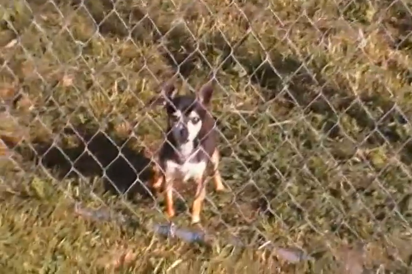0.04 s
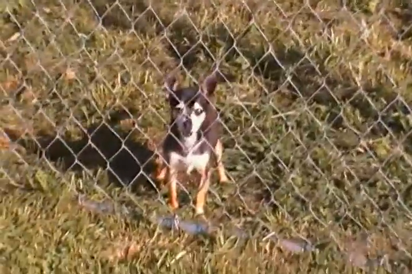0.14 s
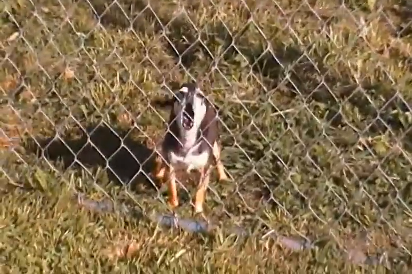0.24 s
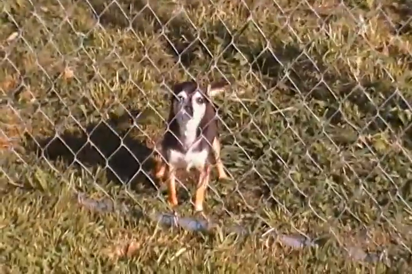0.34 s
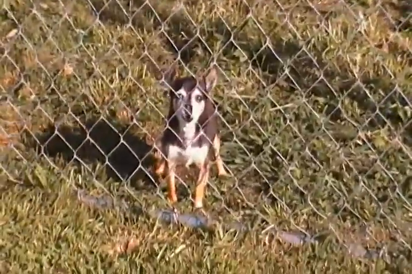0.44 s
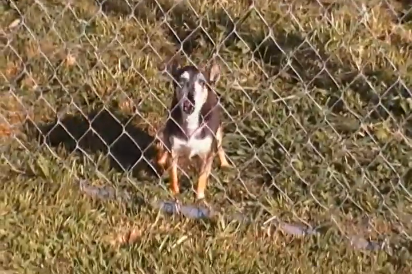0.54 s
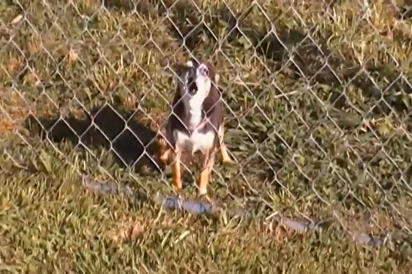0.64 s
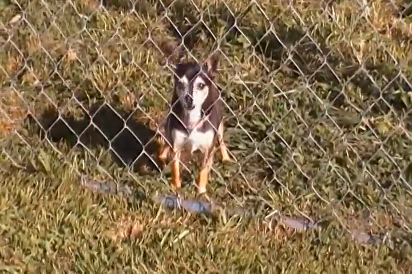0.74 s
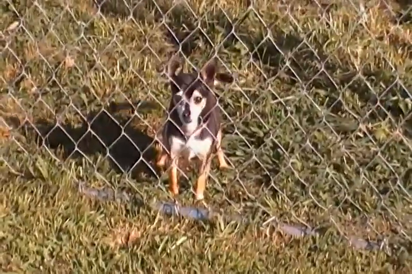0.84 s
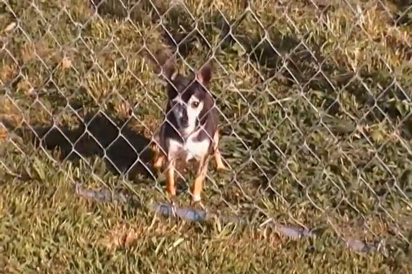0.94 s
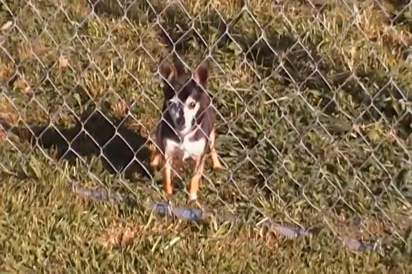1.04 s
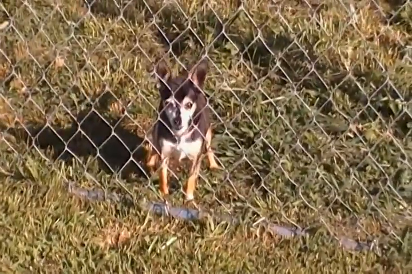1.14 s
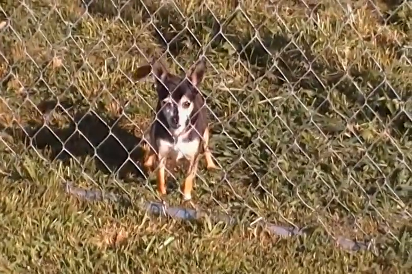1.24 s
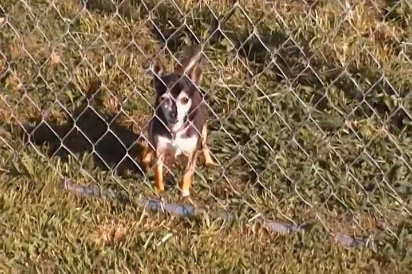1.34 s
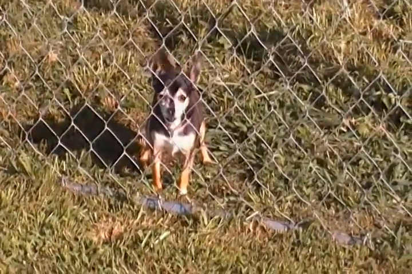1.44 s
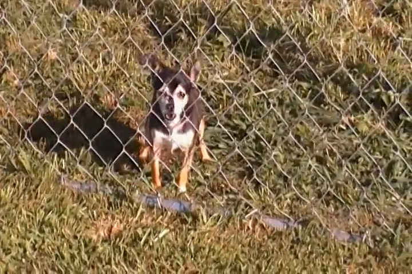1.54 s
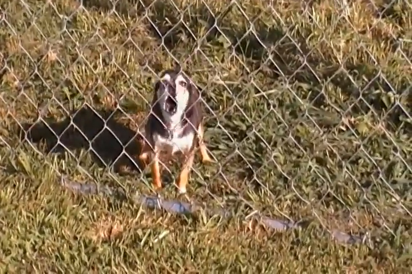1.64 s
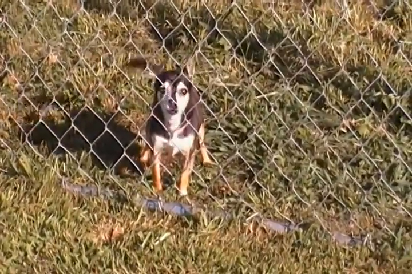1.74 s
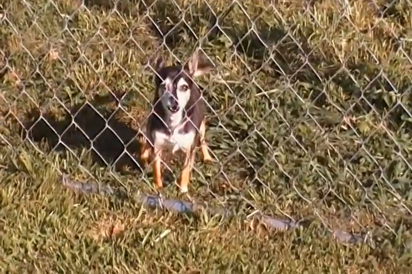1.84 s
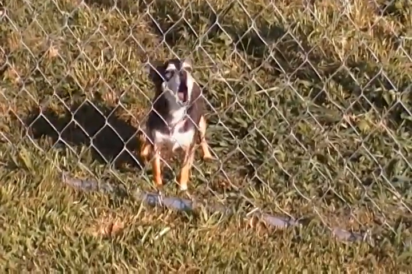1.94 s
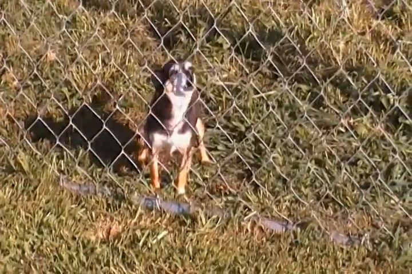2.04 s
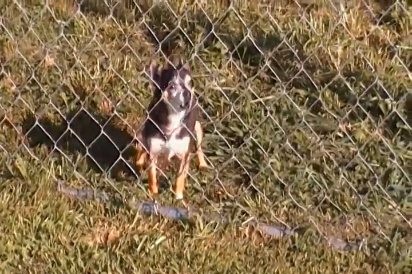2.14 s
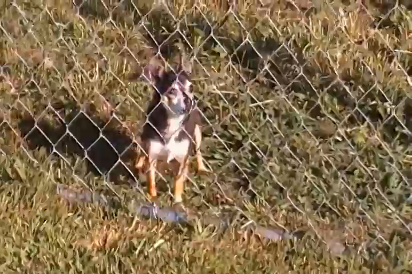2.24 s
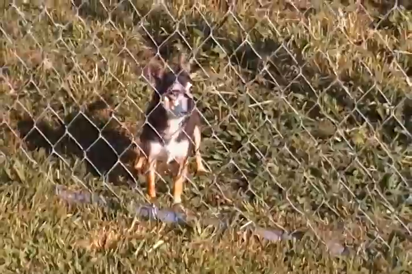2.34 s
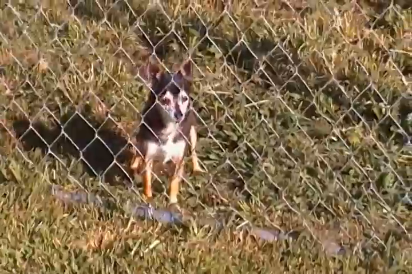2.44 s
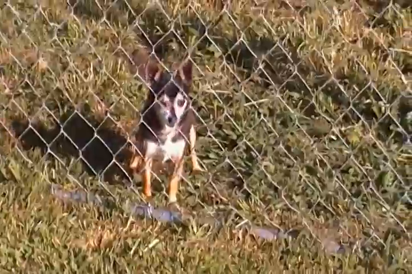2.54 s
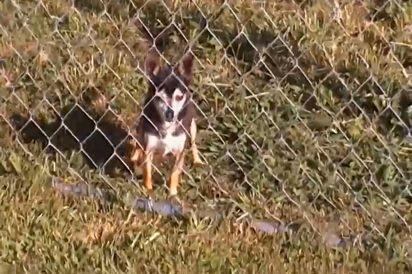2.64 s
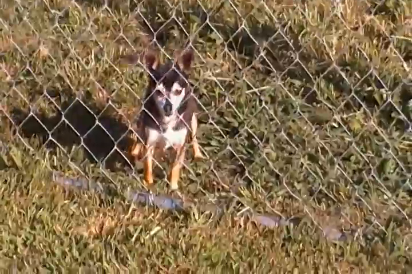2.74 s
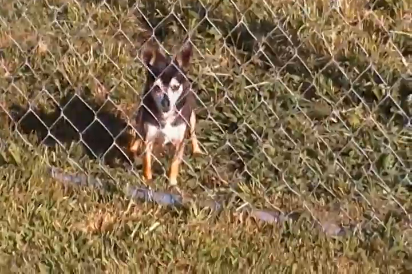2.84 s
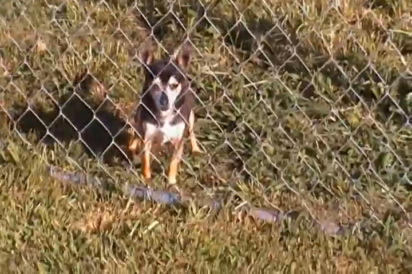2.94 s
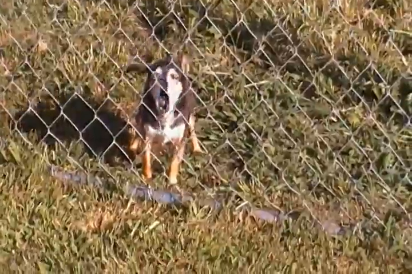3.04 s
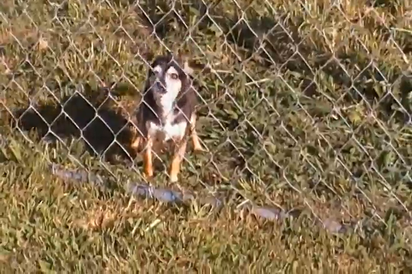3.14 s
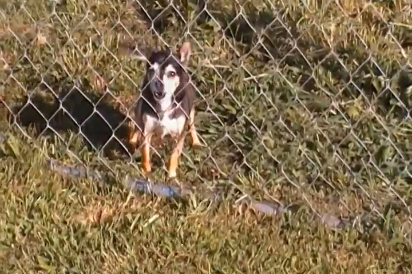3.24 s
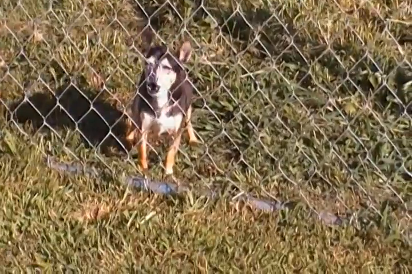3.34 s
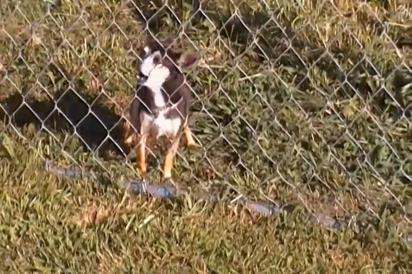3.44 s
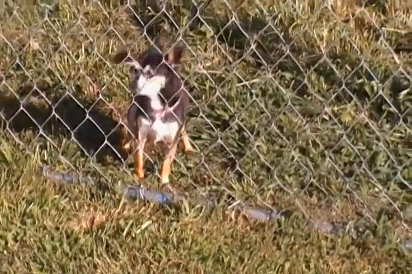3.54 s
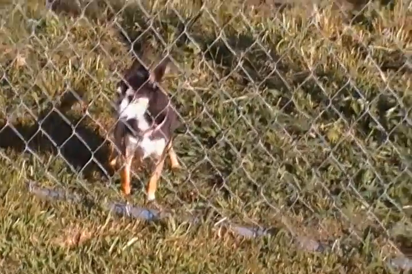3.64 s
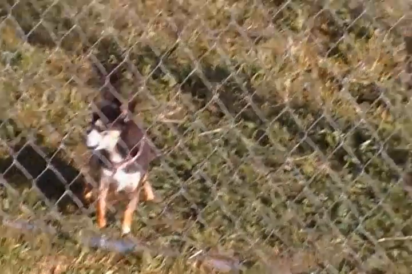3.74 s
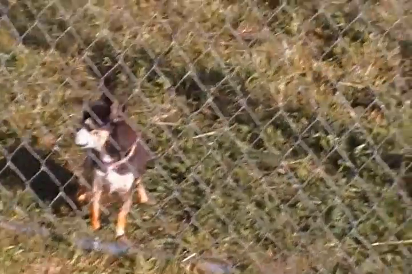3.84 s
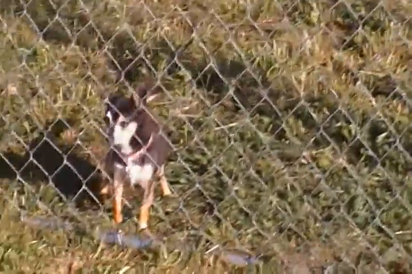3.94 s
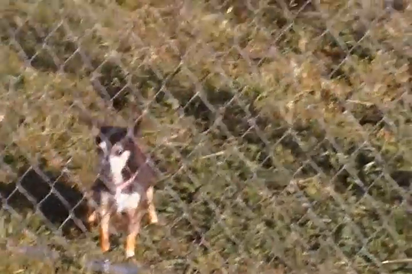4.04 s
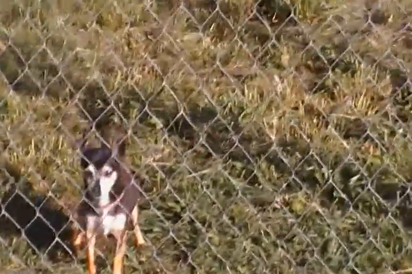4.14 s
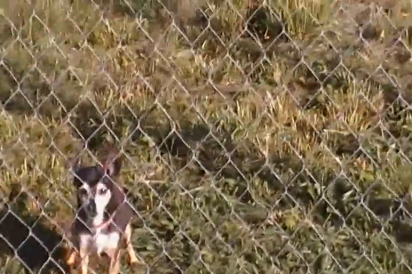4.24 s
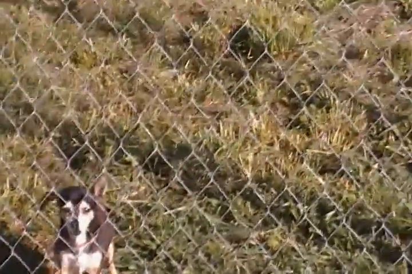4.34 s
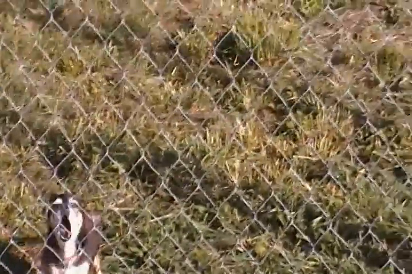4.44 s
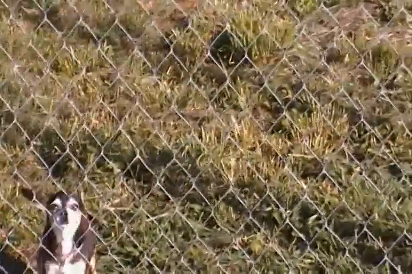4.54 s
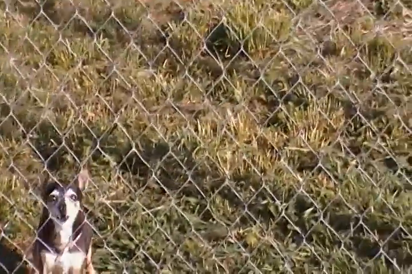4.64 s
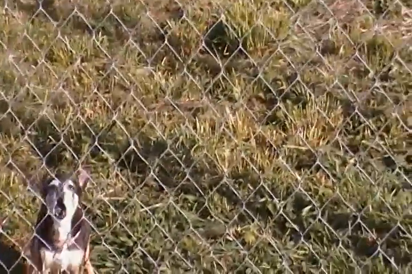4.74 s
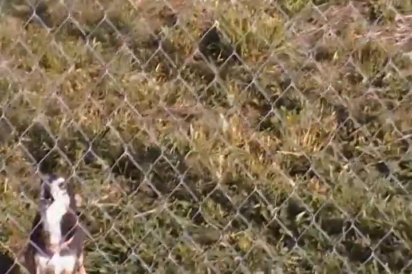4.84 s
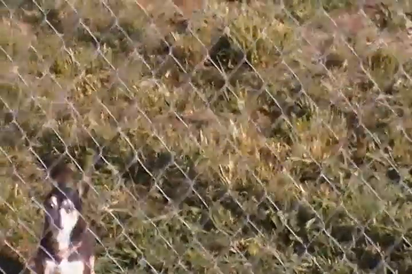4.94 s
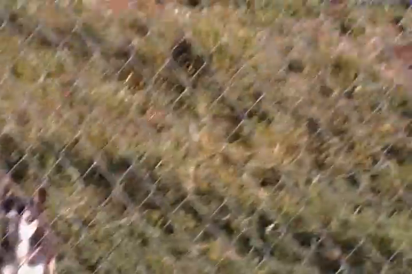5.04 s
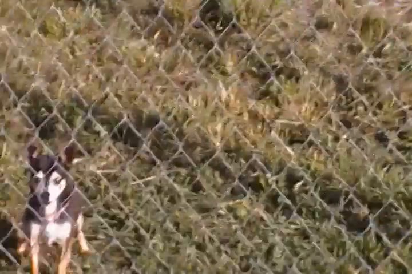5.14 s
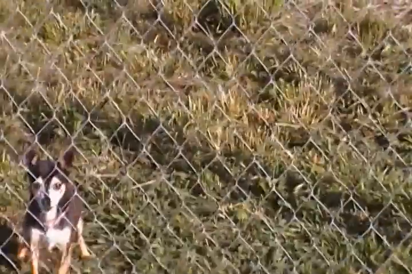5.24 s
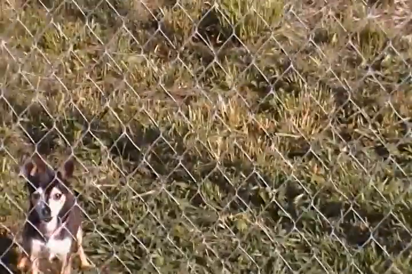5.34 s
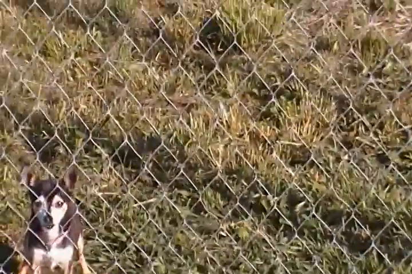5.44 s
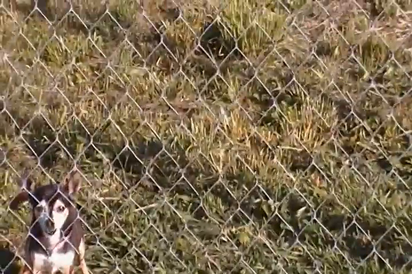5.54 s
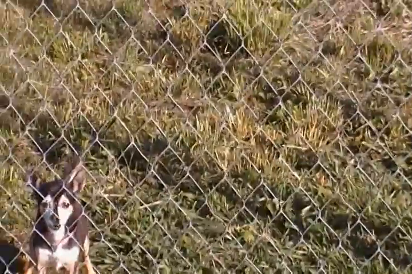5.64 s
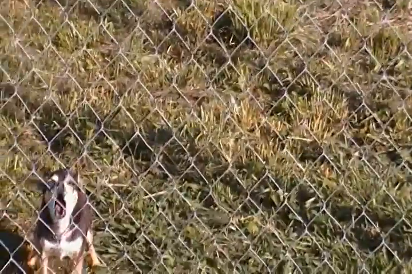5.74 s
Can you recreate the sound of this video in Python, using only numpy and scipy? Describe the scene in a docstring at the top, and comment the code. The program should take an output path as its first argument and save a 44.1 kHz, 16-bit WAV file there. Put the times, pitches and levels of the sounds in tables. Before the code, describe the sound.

An open grassy yard with quiet hissy air, slight wind rumble and the fading echo of earlier barking. A small dog straight ahead yaps at 0.1 and 0.5 s, again at 1.5 and 1.9 s, then once at 3.0 s. Each bark is very short, loud and shrill, swooping up, breaking into a rough rasp and falling away; some open with a tiny throaty rattle. At 3.3 s comes a softer, clean, rising yelp. Another, harsher pair follows at 4.4 and 4.7 s, and a lone raspy bark at 5.7 s. Short echoes scatter back after each. In the gaps, very high thin bird whistles sound faintly to the left around 0.9, 2.3, 3.5 and 5.2 s, with small chirps and a buzzy chatter near 4.1 s. Soft wind buffets peak near 1.8 s; grass rustles lightly; dull microphone taps occur at 2.9, 3.8 and, strongest, 5.3 s. Loud barks sound compressed.

```python
"""Open yard, from 0 s: noise air, wind and grass rustle, bird slurs, the fading echo of earlier barks.
A small dog yaps in pairs from 0.1 s: harmonics roughened by a second vibration and chaos, shaped by a throat
filter; some barks open with a rattle of slaps. Fence and surroundings scatter them as noise-shaped echoes.
Sine whistles from 0.9 s, strongest gust near 1.8 s, damped-sine knocks from 2.9 s, a clean yelp at 3.3 s,
noise chatter near 4.1 s, a lone bark at 5.7 s. Gain control pulls loud sound down throughout."""
import sys
import numpy as np
from scipy import signal
from scipy.fft import rfft, irfft, next_fast_len
from scipy.io import wavfile
from scipy.ndimage import uniform_filter1d, minimum_filter1d

SR = 44100
rng = np.random.default_rng(int(sys.argv[2]) if len(sys.argv) > 2 else 0)


def master_out(mix):
    """Clip the mix to full scale and print it as 16-bit PCM to the path in sys.argv[1]."""
    frames = np.transpose(np.atleast_2d(mix))
    ceiling = np.clip(frames, -1, 1)
    pcm = np.round(ceiling * 32767).astype(np.int16)
    wavfile.write(sys.argv[1], SR, pcm)


N = 254897
TIME = np.arange(N) / SR
CUTOFF_HZ = 13600

# still air, relative spectrum: f/Hz, level/dB
AIR_SPECTRUM = [(30, -50), (120, 15.5), (250, 11.5), (500, -24.5), (1000, -33), (2000, 7.5), (5000, 10),
                (7000, 2), (11000, 5), (12500, -36), (14000, -44)]
# wind rumble, relative spectrum: f/Hz, level/dB
WIND_SPECTRUM = [(15, -1), (35, 2), (75, -4.5), (120, -11.5), (200, -27), (400, -43.5), (1000, -72)]
# gusts on the microphone: middle t/s, length/s, level/dB before buffeting
GUSTS = [(.08, 0.17, -44), (.75, 0.084, -44), (1.28, 0.37, -38), (1.8, 0.16, -25), (2.25, 0.39, -36),
         (2.6, 0.33, -32), (4.98, 0.12, -27)]
# grass rustle, relative spectrum: f/Hz, level/dB
GRASS_SPECTRUM = [(120, 1), (400, 5.5), (1000, -2), (2000, -11), (5000, -10.5), (10000, -10.5),
                  (13000, -11.5)]
# feet shuffling in the grass: middle t/s, length/s, level/dB before crunching
SHUFFLES = [(.03, 0.51, -49), (2.75, 0.63, -48), (3.69, .17, -41), (5.42, 0.24, -45.5), (5.7, .25, -55)]
BREEZE_DB, RUSTLE_DB = -50, -55.5
# stereo noise: f/Hz, left-right correlation/1
LIKENESS = [(30, 0.55), (100, 0.37), (250, 0.67), (1500, 0.99), (4000, 0.76), (10000, 0.32)]
# fading echo of earlier barks, relative spectrum: f/Hz, level/dB
LINGER_SPECTRUM = [(700, -40), (1200, -9.5), (1550, -4.5), (1800, -19), (2600, -20.5), (3200, -12),
                   (4200, -19), (8000, -43)]
# high bird whistles: t/s, length/s, start f/Hz, middle f/Hz, end f/Hz, relative level/dB
WHISTLES = [ (.885, .14, 8490, 8510, 8780, -44), (1.025, .16, 8560, 8390, 8380, -45),
            (2.25, .05, 8470, 8420, 8450, -51), (2.31, .13, 8600, 8810, 9110, -38),
            (2.425, .145, 9030, 8890, 8860, -36), (2.565, .16, 8930, 9120, 8720, -41),
            (3.455, .06, 8200, 7980, 8250, -44), (3.54, .09, 9000, 9080, 8800, -50),
            (3.62, .09, 8720, 8410, 8480, -42), (3.91, .055, 8840, 9050, 9400, -51),
            (4.06, .1, 9280, 9170, 9120, -41), (5.095, .125, 8620, 8790, 8920, -42),
            (5.21, .085, 8820, 9000, 9230, -45), (5.35, .155, 8750, 8380, 8220, -38), ]
# fainter bird slurs: t/s, length/s, start f/Hz, end f/Hz, relative level/dB
SLURS = [(0, 0.052, 5140, 4550, -36), (0.04, .06, 8230, 8750, -48), (0.889, 0.11, 2944, 2380, -34.5),
         (1.29, 0.065, 3483, 4870, -42.5), (1.316, 0.055, 3520, 4150, -43), (1.399, 0.06, 5370, 4110, -40),
         (1.469, 0.051, 4130, 5430, -41), (3.77, 0.052, 4690, 4340, -42), (3.893, 0.087, 3090, 2370, -37),
         (3.973, 0.089, 2620, 2560, -41)]
# buzzing bird chatter: middle t/s, length/s, level/dB before flicker
CHATTER = [(4.07, 0.32, -46.5), (4.29, 0.1, -47)]
# chatter buzz, relative spectrum: f/Hz, level/dB
CHATTER_SPECTRUM = [(3400, -12), (4400, 8), (5100, 9.5), (6200, -29)]
# hand knocks on the camera body: t/s, initial level/dB, f/Hz, 60 dB decay time/s
KNOCKS = [(2.876, -29.5, 710, 0.0091), (3.758, -20, 992, 0.0031), (5.3174, -11.5, 320, 0.014),
          (5.3256, -21.5, 1099, 0.0096)]
# throat rattles opening a bark: start t/s, end t/s, relative level/dB
RATTLES = [(0.488, 0.517, -9), (2.9538, 2.981, -11), (4.363, 4.389, -8.5), (4.695, 4.721, -12.5),
           (5.666, 5.689, -8)]
# resonances rung by the rattle: f/Hz, width/Hz, relative level/dB
RATTLE_MODES = [(260, 126, 7.5), (1247, 290, 16.5), (1710, 98, -12), (3250, 210, -51), (5000, 270, -59),
                (8000, 830, -66)]
# mouth and throat in a bark: f/Hz, gain/dB
BARK_THROAT = [(300, -10), (650, -4), (900, -6.5), (1250, 4.5), (1550, 3), (1850, 2), (2400, -10.5),
               (3300, -2), (4500, -17.5), (5400, -19.5), (7000, -22), (9500, -30), (12000, -33.5),
               (14000, -30)]
# mouth and throat in the yelp: f/Hz, gain/dB
YELP_THROAT = [(300, -52), (800, -4), (1300, -1.5), (1800, 2.5), (2600, -9), (3500, -7), (4400, -24.5),
               (5300, -14.5), (6900, -26), (7800, -40), (9800, -31), (12000, -40)]
# air torn at the vocal folds, relative spectrum: f/Hz, level/dB
RASP_SPECTRUM = [(300, -21), (800, -26), (1300, -36), (1850, 1.5), (2400, -0.5), (3250, -16), (4300, -8.5),
                 (6500, -15.5), (9500, -13.5), (12000, -27.5), (14000, -68)]
# barks: start t/s, attack/s, climb/s, hold/s, opening f/Hz, top f/Hz, base level/dB, sag over hold/dB,
#   overtone slopes in climb, hold and fall/(dB/octave), roughness at break and at end of hold/1
BARKS = [ (.118, .021, 0.046, 0.065, 916, 1589, 3.5, 0, 1.5, -2, -8, 0.27, 0.045),
         (0.507, 0.0053, 0.018, .066, 1222, 1500, 5.5, 3, -1, -8.5, -5, .42, 0.25),
         (1.516, 0.0051, 0.033, .071, 893, 1585, 3.5, 2.5, 1.5, -3, -4.5, 0.43, 0.3),
         (1.871, 0.0058, 0.037, 0.061, 778, 1559, 4.5, 0.5, 2, -9, -5, 0.45, 0.13),
         (2.973, 0.0052, 0.019, .074, 1248, 1558, 2, 0.5, 2, -6.5, -1.5, 0.65, 0.36),
         (4.378, 0.00616, .011, 0.073, 1221, 1492, 2, 3, -3.5, -6.5, -3, 0.77, 0.624),
         (4.713, 0.0053, 0.022, 0.062, 1280, 1515, 5, 3, -0.5, -10.5, -7, 0.66, 0.36),
         (5.679, 0.0066, 0.0056, 0.072, 1335, 1478, 0.5, 0, -8, -7.5, -6, 1, 0.55), ]
# soft unbroken yelp: t/s, f/Hz, relative level/dB
YELP = [(3.327, 792, -39), (3.335, 784, -14), (3.357, 856, -11), (3.391, 924, -11), (3.411, 1003, -17.5),
        (3.427, 977, -21.5), (3.436, 910, -41)]
# scatter off mesh and grass: f/Hz, gain re direct sound/dB
SCATTER = [(1000, -10), (2200, -21), (4500, -14), (8000, 2.5)]
# neighbourhood echo decay: t/s, relative level/dB
ECHO_FADE = [(0, -11), (.05, 4.5), (.13, 0), (.2, -4), (.3, -12), (.45, -24), (.7, -25.5), (1.1, -28),
             (1.8, -43)]
# neighbourhood echo, relative spectrum: f/Hz, level/dB
ECHO_SPECTRUM = [(200, -31), (900, -3.5), (1200, -2.5), (1500, -3.5), (1850, -8.5), (2500, 3.5), (3200, -5),
                 (4000, -3), (6000, -2), (12000, -6)]

# onset: the overtones lag the note
ATTACK_DB, ATTACK_SLOPE_DB_PER_OCTAVE, CLIMB_ROUGH = 24, -17, 0.076
# level follows pitch, with an accent at the top
EFFORT_DB_PER_OCTAVE, ACCENT_DB, ACCENT_S = 10.5, 4.5, 0.012
# at the top: duller, then a rasping break that drags the pitch down
DULLING_S, BREAK_AFTER_S, BREAK_S, DRAG_OCTAVES = 0.015, 0.0018, 0.0097, 0.0704
# held pitch: sinks, arches, corners rounded
SAG_OCTAVES, ARCH_OCTAVES, PITCH_GLIDE_S = 0.0189, 0.02347, 0.012
# treble: weak in the hold, flares as the folds relax
HELD_TREBLE_DB, FLARE_DB, FLARE_AFTER_S, FLARE_S = -4, 11, 0.022, 0.044
# fall: pitch drops, then the breath is let go
FALL_S, FALL_OCTAVES, FALL_ROUGH = 0.047, 0.9, 0.026
LET_GO_S, RELEASE_S, RELEASE_DB, RELEASE_SLOPE_DB_PER_OCTAVE = 0.018, 0.019, 26.5, -7.5
YELP_DB, YELP_ROUGH = -1.2, 0.018


def from_db(db):
    """Decibels to amplitude gain."""
    return 10 ** (np.asarray(db) / 20)


def rms_one(x):
    """Scale to unit power."""
    return x / np.sqrt(np.mean(x ** 2) + 1e-20)


def ramp(t, start, length):
    """Linear rise from 0 to 1 over a length of time."""
    return np.clip((t - start) / max(length, 1e-4), 0, 1)


def blend(a, b, share):
    """Go from a to b as the share goes from 0 to 1."""
    return a + (b - a) * share


def follow(rows, t):
    """Interpolate each column of a curve at the times t."""
    times, *columns = np.transpose(rows)
    return [np.interp(t, times, column) for column in columns]


def at_hz(points, hz):
    """Interpolate a spectrum on a log-frequency axis."""
    f, value = np.transpose(points)
    return np.interp(np.log(hz + 1e-3), np.log(f), value)


def span(start, end):
    """Sample numbers between two times, at least 10 ms where they fit."""
    return np.arange(max(int(start * SR), 0), min(int(max(end, start + .01) * SR), N))


def waver(size, rate_hz):
    """Low-passed random wander with unit rms."""
    low = signal.butter(2, rate_hz, fs=SR, output="sos")
    return rms_one(signal.sosfilt(low, rng.standard_normal(size + 4096))[-size:])


def colour(x, spectrum):
    """Minimum-phase filter from a smooth spectrum, by cepstral folding: the phase of a resonant body."""
    size = 2 * next_fast_len(x.shape[-1] // 2 + 1024)
    gain = from_db(at_hz(spectrum, np.fft.rfftfreq(size, 1 / SR)))
    cepstrum = irfft(np.log(gain))
    cepstrum[1:size // 2] *= 2
    cepstrum[size // 2 + 1:] = 0
    return irfft(rfft(x, size) * np.exp(rfft(cepstrum)), size)[..., :x.shape[-1]]


def resonate(x, hz, width_hz):
    """One two-pole resonance with about unit peak gain."""
    r = np.exp(-np.pi * width_hz / SR)
    zeros = np.array([1, 0, -1]) * (1 - r * r) / 2
    poles = [1, -2 * r * np.cos(2 * np.pi * hz / SR), r * r]
    return signal.lfilter(zeros, poles, x + 1e-18)


def diffuse(spectrum, size=N):
    """Stereo noise from all around, partly correlated between the ears, unit rms."""
    padded = next_fast_len(size)
    hz = np.fft.rfftfreq(padded, 1 / SR)
    alike = np.clip(at_hz(LIKENESS, hz), 0, 1)
    noise = rfft(rng.standard_normal((2, padded)))
    mid, side = noise * np.sqrt([1 + alike, 1 - alike]) * from_db(at_hz(spectrum, hz))
    return rms_one(irfft(np.array([mid + side, mid - side]), padded)[:, :size])


def swells(rows, floor_db=-np.inf):
    """Gain of bell-shaped swells summed in power over a steady floor."""
    power = from_db(floor_db) ** 2
    for middle, length, db in rows:
        power = power + from_db(db) ** 2 * np.exp(-2 * (2 * (TIME - middle) / length) ** 2)
    return np.sqrt(power)


def pan(x, left_db):
    """Place a source by the level of left over right."""
    return x * from_db(np.array([[left_db], [-left_db]]) / 2)


def yard(air_db=-51.0, buffet_db=4.0, crunch_db=3.0):
    """Shaped noise: steady air, lumpy wind on the microphone, feet shifting in the grass."""
    air = from_db(air_db) * diffuse(AIR_SPECTRUM)
    wind = diffuse(WIND_SPECTRUM) * swells(GUSTS, BREEZE_DB) * from_db(buffet_db * waver(N, 9.2))
    grass = diffuse(GRASS_SPECTRUM) * swells(SHUFFLES, RUSTLE_DB) * from_db(crunch_db * waver(N, 31))
    return air + wind + grass


def lingering(level_db=-36, fade_db_per_s=30):
    """Noise decaying exponentially: the neighbourhood still rings from earlier barks."""
    return diffuse(LINGER_SPECTRUM) * from_db(level_db - fade_db_per_s * TIME)


def whistles(level_db=0.24, left_db=6.5):
    """Near-pure tones bending along a parabola, from one side."""
    out = np.zeros(N)
    for start, length, *bend_hz, row_db in WHISTLES:
        at = span(start, start + length)
        bend = np.polyfit([0, .5, 1], bend_hz, 2)
        pitch_hz = np.polyval(bend, ramp(TIME[at], start, length))
        phase = 2 * np.pi * np.cumsum(pitch_hz * (1 + .0008 * waver(len(at), 120))) / SR
        level = np.sqrt(2) * from_db(level_db + row_db)
        out[at] += np.sin(phase) * level * signal.windows.tukey(len(at), .25)
    return pan(out, left_db)


def slurs(level_db=-7, quiver=0.037):
    """Quivering tones gliding geometrically in pitch, centred."""
    out = np.zeros(N)
    for start, length, from_hz, to_hz, row_db in SLURS:
        at = span(start, start + length)
        pitch_hz = np.geomspace(from_hz, to_hz, len(at)) * (1 + quiver * waver(len(at), 230))
        tone = np.sin(2 * np.pi * np.cumsum(pitch_hz) / SR)
        out[at] += np.sqrt(2) * from_db(level_db + row_db) * tone * signal.windows.tukey(len(at), .5)
    return out


def chatter(flicker_db=3):
    """Buzzing chatter: band-shaped noise with a flickering level."""
    return diffuse(CHATTER_SPECTRUM) * swells(CHATTER) * from_db(flicker_db * waver(N, 25))


def knocks():
    """Quickly damped sines: dull taps on the camera body."""
    out = np.zeros(N)
    for start, initial_db, hz, t60_s in KNOCKS:
        at = span(start, start + 2 * t60_s)
        t = TIME[at] - TIME[at[0]]
        out[at] += from_db(initial_db - 60 * t / t60_s) * np.sin(2 * np.pi * hz * t)
    return out


def rattles(first_hz=180, last_hz=275, growth_db=19, grit=0.072, grit_s=0.0058, trim_db=-4):
    """Separate slaps of the slack folds come faster and harder, ringing the throat."""
    out = np.zeros(N)
    for start, end, level_db in RATTLES:
        at = span(start, end + 0.048)
        progress = (TIME[at] - TIME[at[0]]) / max(end - start, .01)
        cycles = np.cumsum(first_hz + (last_hz - first_hz) * progress) / SR
        clicks = np.diff(np.floor(cycles), prepend=-1) * (progress < 1)
        slaps = clicks * from_db(growth_db * (progress - 1))
        # each slap lets a short burst of air through
        puff_envelope = signal.lfilter([1], [1, -np.exp(-1 / (grit_s * SR))], slaps)
        driven = slaps + grit * puff_envelope * rng.standard_normal(len(at))
        rung = sum(from_db(db) * resonate(driven, hz, width_hz) for hz, width_hz, db in RATTLE_MODES)
        out[at] -= from_db(level_db + trim_db) * rms_one(rung)
    return out


def voice(at, pitch_hz, level_db, slope_db, rough, throat, treble_db,
          second_hz=410, second_depth=0.69, second_jitter=0.11, jitter=0.0057, flutter_bend=0.07,
          chaos_hz=170, chaos_bend=0.064, chaos_db=7.5, hiss_db=-31, rasp_db=-12,
          gape_db=2.5, closing_db=5.0, rounding_db=2.0):
    """Vocal folds through the throat; pressed hard, a slower second vibration and chaos roughen them."""
    out, size = np.zeros(N), len(at)
    rough = np.clip(rough, 0, 1)
    level = from_db(level_db) * signal.windows.tukey(size, .08)
    flutter = (jitter + flutter_bend * rough) * waver(size, 493)
    bend = flutter + chaos_bend * rough ** 2 * waver(size, chaos_hz)
    phase = 2 * np.pi * np.cumsum(pitch_hz * (1 + bend)) / SR
    k = np.arange(1, 15)[:, None]  # harmonic numbers
    strengths = from_db(slope_db * np.log2(k)) * (k * pitch_hz < CUTOFF_HZ)
    # the jaw starts wide open and closes, dulling the treble
    treble = np.clip((k * pitch_hz - 3800) / 1400, 0, 1)
    jaw_db = gape_db - closing_db * np.linspace(0, 1, size)
    strengths = strengths * from_db(treble * (treble_db + jaw_db))
    # slow shutting of the folds rounds off the highest harmonics
    strengths = strengths * from_db(-rounding_db * np.maximum(k - 7, 0))
    # the second vibration adds a side line above each harmonic, more strongly above the overtones
    second_bend = (second_jitter + rough ** 2 / 2) * waver(size, chaos_hz)
    second = 2 * np.pi * np.cumsum(second_hz * (1 + second_bend)) / SR
    coupling = second_depth * np.minimum(rough, .5) * np.minimum(k, 2) ** 2
    lines = np.cos(k * phase) + coupling * np.cos(k * phase + second)
    folds = -np.sum(strengths * lines, axis=0)
    # evens out the level as harmonics sweep through the resonances
    throat_gain = from_db(at_hz(throat, k * pitch_hz))
    carried = np.sqrt(np.sum((strengths * throat_gain) ** 2, axis=0) / 2)
    # upward swings capped: chaos makes the note sag and catch rather than burst
    swell = from_db(chaos_db * rough ** 2 * np.minimum(waver(size, chaos_hz), 1))
    note = colour(folds / carried * swell * level, throat)
    # air escapes in puffs, once a cycle
    puffs = rng.standard_normal(size) * (1 + np.cos(phase)) * swell
    air = rms_one(colour(puffs, RASP_SPECTRUM))
    out[at] = note + air * level * (from_db(hiss_db) + from_db(rasp_db) * rough ** 2)
    return out


def yelp(slope_db_per_octave=3.0, dulling=0.6):
    """A clean note, mostly rising, with overtones that weaken as it softens."""
    at = span(YELP[0][0], YELP[-1][0])
    pitch_hz, level_db = follow(YELP, TIME[at])
    slope_db = slope_db_per_octave + dulling * (level_db - level_db.max())
    return voice(at, pitch_hz, level_db + YELP_DB, slope_db, YELP_ROUGH, YELP_THROAT, 0)


def bark(start, attack_s, climb_s, hold_s, opening_hz, top_hz, level_db, sag_db,
         climb_slope_db, held_slope_db, fall_slope_db, first_rough, last_rough):
    """The folds tighten to a top note, break into a rasp while held, then slacken and fall away."""
    top = start + attack_s + climb_s
    drop = top + hold_s
    at = span(start, drop + FALL_S)
    t = TIME[at]
    # progress of each phase, 0-1
    unopened = 1 - ramp(t, start, attack_s)
    climbed = ramp(t, start + attack_s, climb_s)
    held = ramp(t, top, hold_s)
    fallen = ramp(t, drop, FALL_S)
    eased = ramp(t, drop - BREAK_S / 2, BREAK_S)
    released = 1 - np.exp(-np.maximum(t - drop - LET_GO_S, 0) / RELEASE_S)

    rasp = blend(first_rough, last_rough, held)
    rough = blend(CLIMB_ROUGH, rasp, ramp(t, top + BREAK_AFTER_S, BREAK_S))
    rough = blend(rough, FALL_ROUGH, eased)

    octaves = np.log2(opening_hz / top_hz) * (1 - climbed)
    octaves = octaves - DRAG_OCTAVES * rough - SAG_OCTAVES * held - FALL_OCTAVES * fallen
    octaves = octaves + ARCH_OCTAVES * np.sin(np.pi * held)
    octaves = uniform_filter1d(octaves, size=int(PITCH_GLIDE_S * SR))

    flare = np.exp(-((t - drop - FLARE_AFTER_S) / FLARE_S) ** 2)
    treble_db = HELD_TREBLE_DB * ramp(t, top, BREAK_S) + FLARE_DB * flare
    effort_db = EFFORT_DB_PER_OCTAVE * octaves + ACCENT_DB * np.exp(-((t - top) / ACCENT_S) ** 2)
    envelope_db = -ATTACK_DB * unopened - sag_db * held - RELEASE_DB * released

    slope_db = climb_slope_db + ATTACK_SLOPE_DB_PER_OCTAVE * unopened
    slope_db = blend(slope_db, held_slope_db, ramp(t, top - DULLING_S / 2, DULLING_S))
    slope_db = blend(slope_db, fall_slope_db, eased)
    slope_db = blend(slope_db, RELEASE_SLOPE_DB_PER_OCTAVE, released)
    loudness_db = level_db + effort_db + envelope_db
    return voice(at, top_hz * 2 ** octaves, loudness_db, slope_db, rough, BARK_THROAT, treble_db)


def fence(x, decay_s=.0025):
    """Mesh and grass scatter the sound for a few milliseconds, differently for each ear."""
    t = TIME[:SR // 100]
    response = rms_one(rng.standard_normal((2, len(t))) * np.exp(-t / decay_s)) / np.sqrt(len(t))
    return signal.fftconvolve(x[None], colour(response, SCATTER), axes=1)[:, :N]


def neighbourhood(x, echo_db=-23.5):
    """Houses, walls and trees scatter sound back as a decaying noise response of unit energy."""
    t = TIME[:2 * SR]
    response = diffuse(ECHO_SPECTRUM, size=len(t)) * from_db(follow(ECHO_FADE, t)[0])
    response = rms_one(response) / np.sqrt(len(t))
    return from_db(echo_db) * signal.fftconvolve(x[None], response, axes=1)[:, :N]


def scene(bird_echo_db=4):
    """Yard and birds behind, dog straight ahead, echoes of both."""
    background = yard() + lingering() + knocks()
    song = whistles() + slurs() + chatter()
    dog = rattles() + yelp() + sum(bark(*row) for row in BARKS)
    echo = neighbourhood(dog + from_db(bird_echo_db) * song.mean(axis=0))
    return background + song + echo + fence(dog) + dog


def gain_control(x, threshold_db=-11, squeeze=0.76, attack_s=0.00011, release_db_per_s=115, hold_size=1501):
    """Loud sound pulls the gain down at once; it is held briefly, then creeps back."""
    power = uniform_filter1d(np.mean(x ** 2, axis=0), size=180)
    level_db = 10 * np.log10(np.abs(power) + 1e-12)
    cut_db = squeeze * np.maximum(level_db - threshold_db, 0)
    # hold: deepest cut of the last 34 ms
    cut_db = -minimum_filter1d(-cut_db, size=hold_size, origin=(hold_size - 1) // 2)
    # release: the cut shrinks no faster than this rate
    recovery_db = release_db_per_s * TIME
    cut_db = np.maximum.accumulate(cut_db + recovery_db) - recovery_db
    r = np.exp(-1 / (attack_s * SR))
    return x * from_db(-signal.lfilter([1 - r], [1, -r], cut_db))


def record(dry):
    """Gain control, clipping just under full scale, then a steep low-pass."""
    clipped = np.clip(gain_control(dry), -.92, .92)
    return signal.sosfilt(signal.cheby2(16, 95, CUTOFF_HZ, fs=SR, output="sos"), clipped)


dry = scene()
out = record(dry)
master_out(out)
```